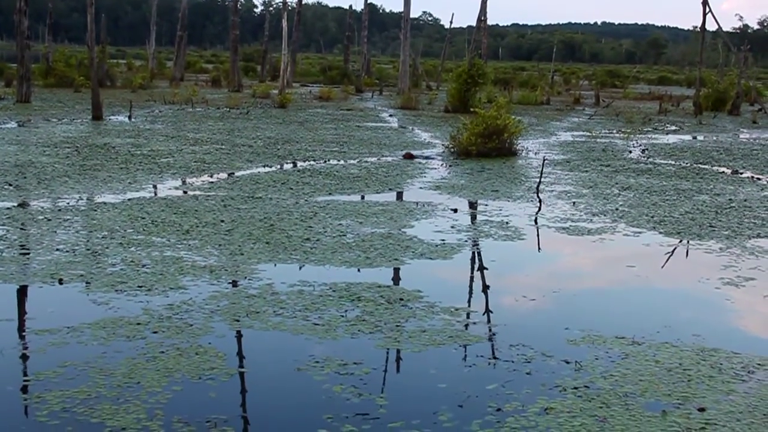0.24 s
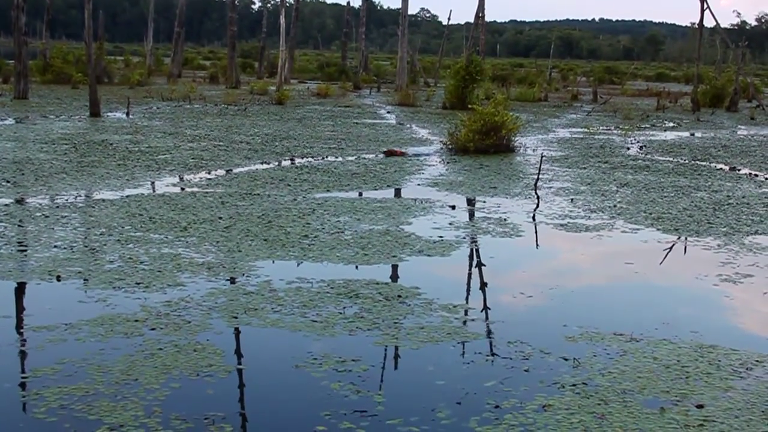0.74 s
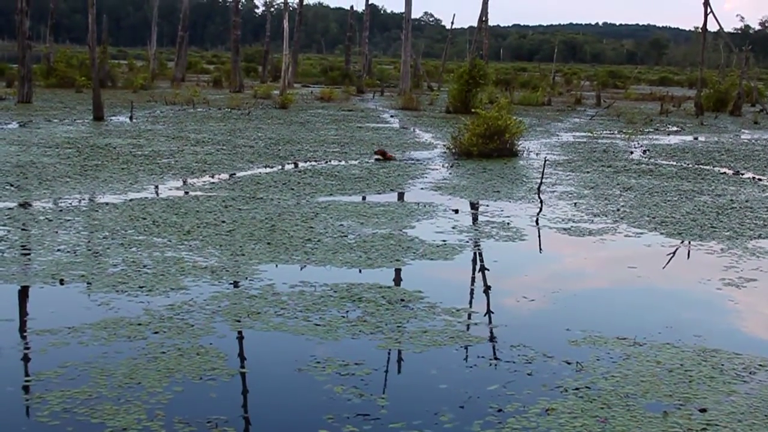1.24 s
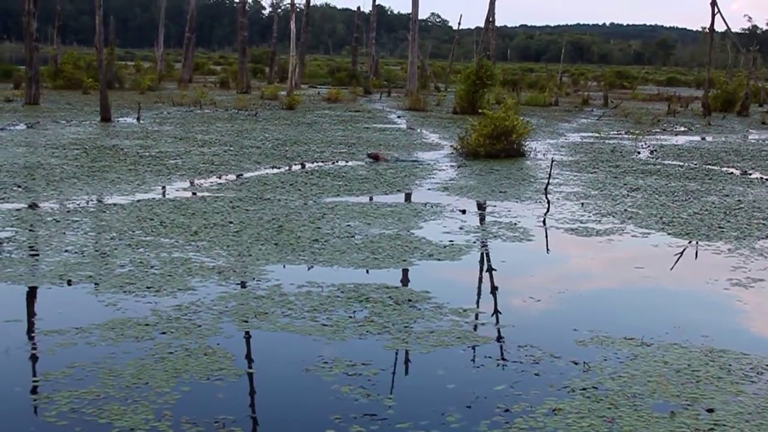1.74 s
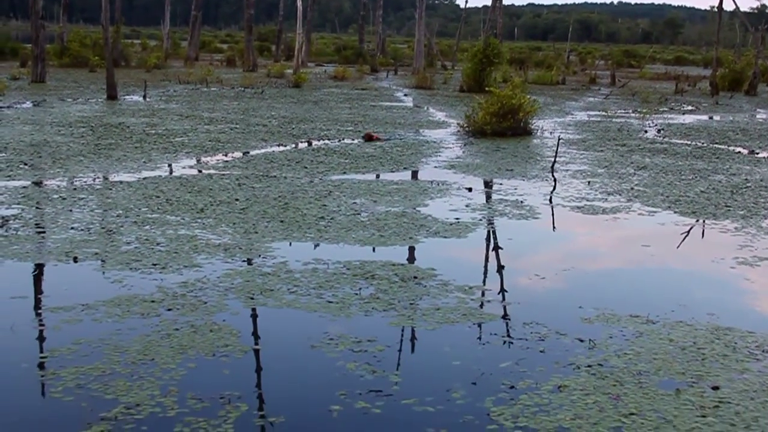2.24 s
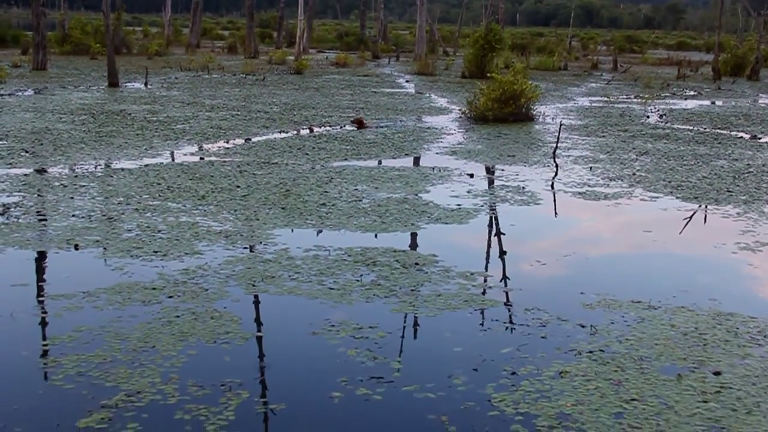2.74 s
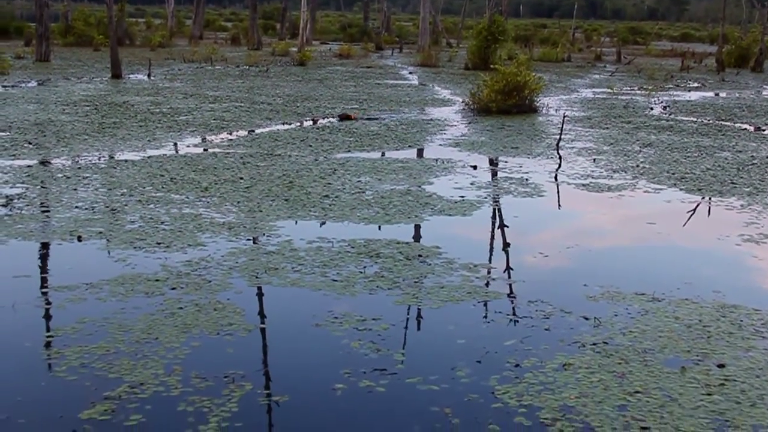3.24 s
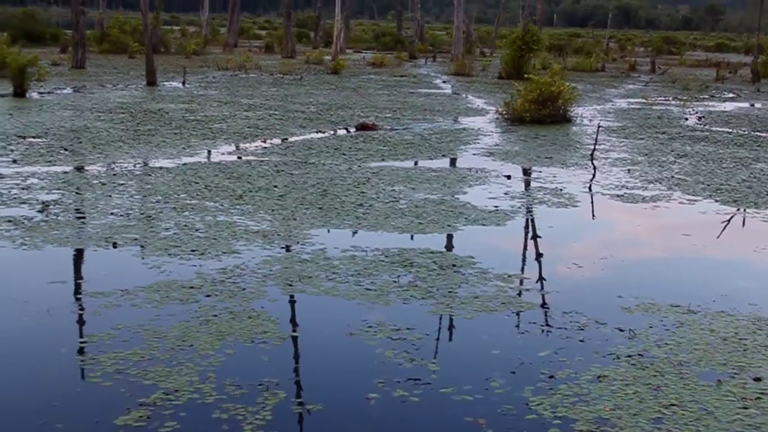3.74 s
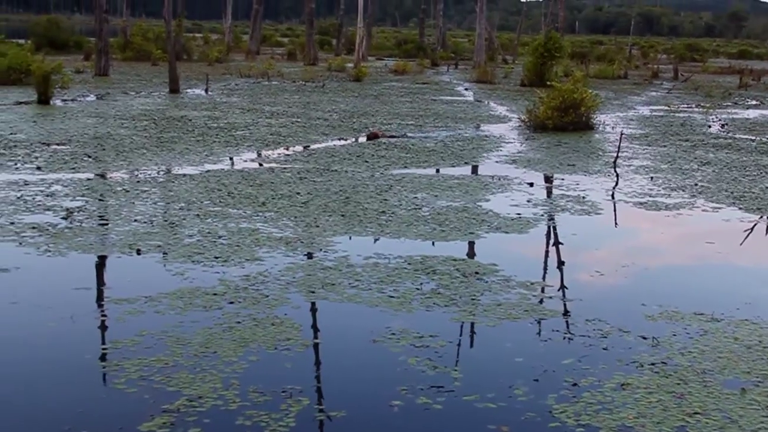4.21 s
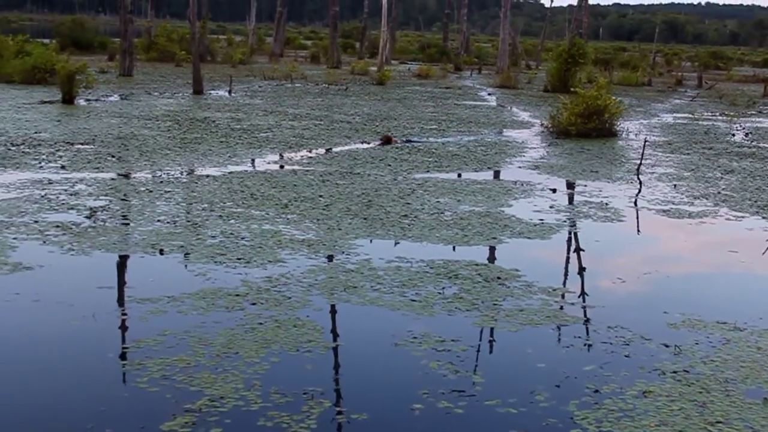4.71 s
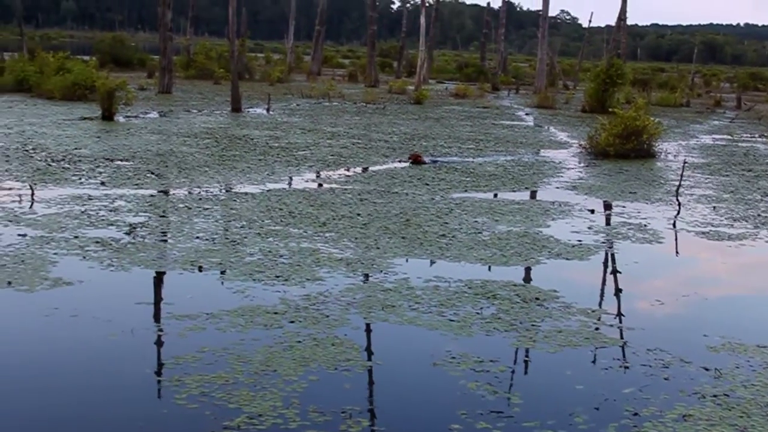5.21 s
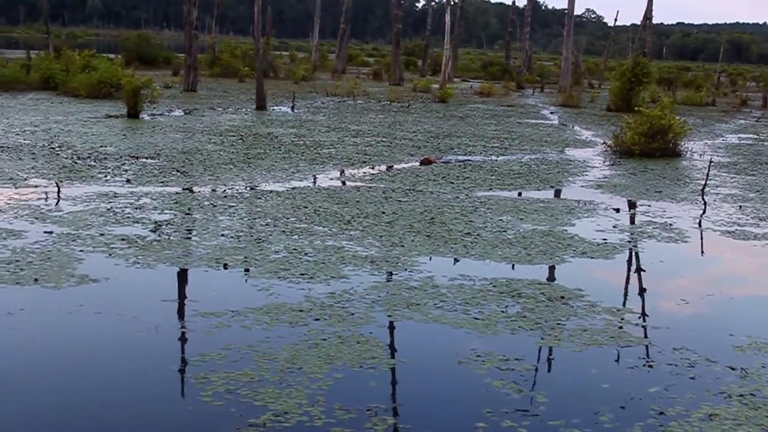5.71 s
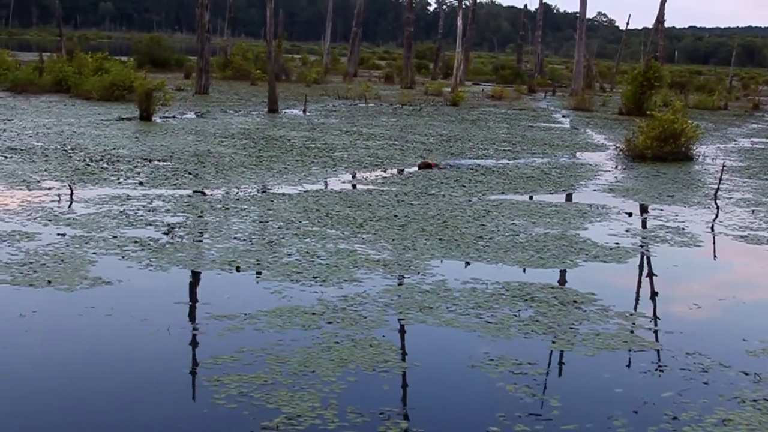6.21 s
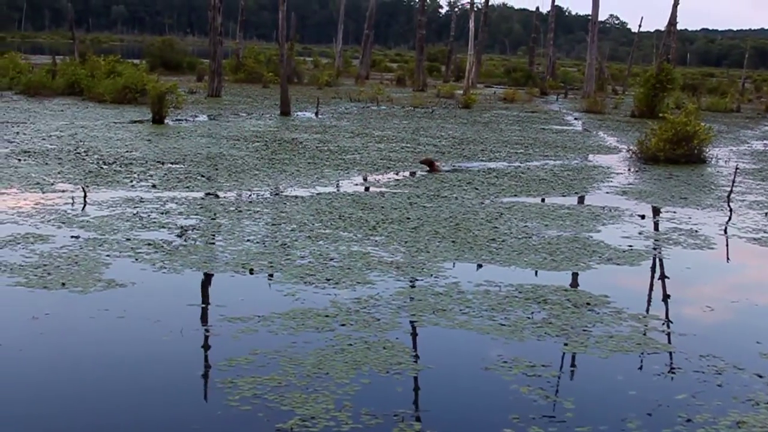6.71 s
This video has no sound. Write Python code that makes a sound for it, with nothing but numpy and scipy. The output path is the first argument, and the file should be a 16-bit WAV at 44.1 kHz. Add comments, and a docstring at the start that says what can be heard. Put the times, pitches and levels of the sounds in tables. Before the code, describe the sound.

Wetland ambience opens quietly with a very faint, quick run of alternating high and low chirps, then crickets, katydids and distant traffic swell into a steady bed. Short bubbly blips, muffled knocks and dry ticks happen near the microphone, busiest early and again late. A remote engine drone rises slightly in pitch after the middle and slowly nears. The final loudest sound is a bright, tiny water plip. Outdoor, centred, with no strong echo.

```python
"""Dusk over a marsh pond

Crickets trill and throb in the reeds; meadow katydids buzz and tick above them.
Water plops, small bubbles pop, and soft knocks and ticks sound close by.
Far off lie a road, a caller's brief chirps and a humming engine. The steady beds swell at the start.
Insects and traffic are shaped noise, ringing pulses and tones; bubbles and engine are short or steady tones.
"""
import sys
import numpy as np
from scipy import signal
from scipy.fft import rfft, irfft, next_fast_len
from scipy.io import wavfile

SR = 44100
rng = np.random.default_rng(int(sys.argv[2]) if len(sys.argv) > 2 else 0)


def wav_out(sig):
    """Save sig, one row per channel (or a flat mono array), as 16-bit PCM at SR to the path in sys.argv[1]."""
    wavfile.write(sys.argv[1], SR, np.round(np.clip(np.atleast_2d(sig).T, -1, 1) * 32767).astype(np.int16))


N = 306495
TIME = np.arange(N) / SR   # s

# Tone colour of each noise: (frequency [Hz], relative level [dB])
RUMBLE_SPECTRUM = [(20, -17), (45, -10), (70, 0), (110, 1.5), (180, 3), (290, 0), (400, -9.5), (600, -27),
                   (1200, -63)]
ROAD_SPECTRUM = [(250, -12), (450, -9), (650, -2.5), (880, 1), (1120, -2), (1320, -0.5), (1480, -8),
                 (2000, -12.5), (2600, -8.5), (5000, -15)]
CHORUS_SPECTRUM = [(1900, -49), (2250, -16.5), (2520, -11.5), (3050, -9.5), (3280, -2.5), (3500, -2.5),
                   (3750, -4.5), (3950, 0.5), (4250, 1), (4380, -4), (4500, 4), (4700, -5.5), (5400, -6)]
UPPER_CHORUS_SPECTRUM = [(4200, -31), (4850, 3), (5050, -4), (5300, 1.5), (5900, -1.5), (6400, -5.5),
                         (6700, -7), (7200, -8), (7600, -10), (8300, -11), (9200, -20), (10500, -21.5),
                         (13000, -16.5), (16000, -26)]
KATYDID_SPECTRUM = [(9000, -12.5), (10800, -9), (12000, -3), (13200, -3), (13700, -3.5), (14400, -2.5),
                    (15500, -6), (16000, -5)]
ZIP_SPECTRUM = [(10800, -30), (12200, -2), (13000, -5), (14300, 1), (16000, -10)]
KNOCK_SPECTRUM = [(40, 2), (80, -2), (300, -3), (560, 1.5), (900, -2), (1300, 1), (2000, -7.5), (2700, -2),
                  (3600, -8), (7000, -15), (15000, -27)]
TICK_SPECTRUM = [(2000, 2), (5000, 0), (10000, -7), (13000, 4), (16000, -8)]
# Engine tones: (multiple of firing rate [1], relative level when slow [dB], relative level when fast [dB])
ENGINE_TONES = [(1, -64, -65.5), (1.5, -55.5, -72), (2, -72, -63.5), (2.5, -57, -74), (3, -69, -55),
                (4, -55.5, -57.5), (5, -74, -60.5)]
# Nearer crickets: (wing pitch [Hz], relative width of the ring [Hz], wing strokes [per s],
# relative level [dB], throb depth [0-1], share in the opening swell [0-1])
NEAR_CRICKETS = [(2960, 440, 61, -55, 0.3, 0.8), (3320, 360, 30.4, -51, 0.97, 0.7),
                 (3600, 260, 33, -54, 0, 0), (3943, 120, 46.1, -49, 0.8, 1),
                 (4177, 99, 46.2, -47, 0.3, 0.9), (4550, 140, 53, -54, 0, 0.04), (5220, 300, 47, -49, 0, 1),
                 (6060, 480, 41, -48.5, 0, 1)]
# Thin, steady cricket trills: (pitch [Hz], level relative to the chorus [dB])
THIN_TRILLS = [(2682, -19), (2927, -29), (3107, -18), (3460, -32), (3967, -17), (4208, -20), (5344, -23),
               (5966, -18), (6049, -23), (6317, -26)]
# Single katydid strokes: (time [s], level [dB])
KATYDID_ZIPS = [(2.46, -41.5), (2.583, -40.5), (2.768, -38), (5.708, -42), (6.059, -40), (6.193, -39.5),
                (6.423, -44)]
# Soft knocks and rustles: (time [s], level [dB], spread to each side [s])
SOFT_KNOCKS = [(.357, -45, 0.0064), (0.378, -45, .004), (.625, -49, 0.029), (0.914, -43.5, .014),
               (1.473, -36.5, 0.0068), (1.522, -40.5, .0046), (1.701, -41, 0.019), (2.106, -42.5, .009),
               (5.238, -39.5, 0.012), (5.677, -44, .022)]
# Water plops: (time [s], relative level [dB], starting pitch [Hz])
WATER_PLOPS = [(.517, -40, 637), (.96, -34, 1640), (1.264, -33.5, 1750), (1.467, -31, 546),
               (1.678, -37, 574), (1.722, -30.5, 1250), (2.1, -34.5, 720), (2.101, -34, 2490),
               (2.196, -33.5, 666), (2.229, -35, 620), (3.093, -28.5, 2690), (3.627, -30, 1260),
               (4.43, -31, 2160), (5.052, -31, 1280), (5.224, -33, 1750), (5.371, -31, 1750),
               (5.392, -29.5, 730), (5.672, -31, 1830), (5.705, -28, 1510), (6.019, -32.5, 1570),
               (6.839, -23, 2580)]
# Dry ticks: (time [s], level [dB])
DRY_TICKS = [(1.728, -40), (3.095, -35.5), (3.907, -40), (5.687, -36), (6.841, -42)]
# Bouts of harder katydid singing: (time [s], gain [dB], spread to each side [s])
KATYDID_BOUTS = [(2.8, 0.9, .45), (5.45, 2.5, .2)]

# How each bed climbs, then holds:
# (held level [dB], depth of the climb [dB], length of the climb [s], bend [1 = even])
RUMBLE_CLIMB = (-50.5, 10, 3, 1.3)
ROAD_CLIMB = (-45, 12.5, 2.5, 1.9)
CHORUS_CLIMB = (-40.5, 9, 4, 1.0)
UPPER_CHORUS_CLIMB = (-43, 11, 5, 1.95)
KATYDID_CLIMB = (-51.5, 8, 2, 1.2)
NEAR_CRICKETS_CLIMB = (0, 34, 4, 1)
ENGINE_CLIMB = (-1.5, 22, 2.5, 0.55)
# One swell of far traffic: (time [s], gain [dB], spread to each side [s])
TRAFFIC_SWELL = (5.72, 2.4, 0.62)

SLOW_FIRING_HZ, FAST_FIRING_HZ = 71.5, 75.85
SPEED_UP_S, SPEED_LAG_S, APPROACH_DB_PER_S = 3.55, 0.4, 2.7
CHIRP_START_S, CHIRP_GAP_S = 0.022, 0.049
CHIRP_HZ, CHIRP_DB, CHIRP_SPREAD_S = (4800, 3510), -44.5, 0.009
POPS_PER_S, POPS_DB = 7, -12   # rate on calm water; level against the road bed
STIRRED_POPS_PER_S, STIR_SPREAD_S = 90, 0.05   # extra pops around each knock
POP_TILT_DB_PER_OCTAVE = -4.5   # high bubbles are smaller and fainter
BUBBLE_RISE_OCTAVES_PER_S = 8.0
PLOP_RING_CYCLES = 41   # cycles of the starting pitch in which a ring dies by 60 dB
PULSING_DEPTH, PULSING_WANDER = 0.5, 0.16   # katydid wing pulsing, 0-1
THROB_HZ, THROB_PEAK_S = 10.0, 5.03
CUTOFF_HZ = 15850


def from_db(db):
    """Turn decibels into a gain."""
    return 10 ** (np.asarray(db) / 20)


def rms_one(x):
    """Scale a sound to an average (rms) strength of 1."""
    return x / np.sqrt(np.mean(x ** 2) + 1e-20)


def drift(rate_hz):
    """Smooth random wandering with rms 1; a higher rate wanders faster."""
    step = 40   # work on every 40th sample, then join the points by lines
    r = np.exp(-2 * np.pi * rate_hz * step / SR)
    # The first 2000 points let the filter settle.
    random_steps = rng.standard_normal(N // step + 2002)
    slow = signal.lfilter([1], [1, -2 * r, r * r], random_steps)[2000:]
    return np.interp(np.arange(N) / step, np.arange(len(slow)), rms_one(slow))


def noise(spectrum):
    """Random hiss coloured by a spectrum, with rms 1."""
    size = next_fast_len(N)
    hz, db = np.transpose(spectrum)
    bins = np.maximum(np.arange(size // 2 + 1) * SR / size, 1)
    gain = from_db(np.interp(np.log(bins), np.log(hz), db, left=-90, right=-90))
    white = rng.standard_normal(size)
    return rms_one(irfft(rfft(white) * gain, size)[:N])


def resonate(x, hz, width_hz):
    """Ring at one pitch, as a struck body does; a narrow width rings longer."""
    r = np.exp(-np.pi * width_hz / SR)
    feedback = [1, -2 * r * np.cos(2 * np.pi * hz / SR), r * r]
    return signal.lfilter([1 - r, 0, r - 1], feedback, x + 1e-18)


def cycles(hz):
    """Count the cycles completed at a changing rate."""
    return np.cumsum(hz) / SR


def rise(level_db, depth_db, length_s, bend):
    """Level in dB that climbs from the start and then holds."""
    return level_db - depth_db * np.clip(1 - TIME / length_s, 0, 1) ** bend


def bell(s, height, spread_s):
    """A smooth bump around one moment."""
    return height * np.exp(-0.5 * ((TIME - s) / spread_s) ** 2)


def swells(rows):
    """Loudness curve of bell-shaped bursts from rows (time [s], level [dB], spread [s])."""
    out = np.zeros(N)
    for s, db, spread_s in rows:
        # Only the stretch close to the burst needs computing.
        near = slice(*np.searchsorted(TIME, [s - 4 * spread_s, s + 4 * spread_s]))
        out[near] += from_db(db) * np.exp(-0.5 * ((TIME[near] - s) / spread_s) ** 2)
    return out


def across_water(x, t60, direct):
    """Reeds and trunks scatter a far call into a short tail behind the direct sound."""
    t = TIME[:SR // 4]
    tail = rng.standard_normal(len(t)) * from_db(-60 * t / t60)   # falls 60 dB in t60 seconds
    scattered = signal.oaconvolve(x, tail / np.linalg.norm(tail))[:N]
    return rms_one(direct * x + scattered)


def throb(depth):
    """Crickets swell together ten times a second."""
    return 1 + np.clip(depth, 0, 1) * np.cos(2 * np.pi * THROB_HZ * (TIME - THROB_PEAK_S))


def far_road():
    """Rumble and tyre wash blend into low, unsteady noise from a far road."""
    rumble_db = rise(*RUMBLE_CLIMB) + 0.5 * drift(12.0)
    rumble = from_db(rumble_db) * noise(RUMBLE_SPECTRUM)
    wash_db = rise(*ROAD_CLIMB) + bell(*TRAFFIC_SWELL) + 0.97 * drift(25)
    wash = from_db(wash_db) * noise(ROAD_SPECTRUM)
    return rumble + wash


def engine():
    """A far engine speeds up and approaches; its tones shift weight with speed and waver on their way."""
    since_s = np.maximum(TIME - SPEED_UP_S, 0)
    speed = 1 - np.exp(-since_s / SPEED_LAG_S)   # 0 = slow, 1 = fast
    firing_hz = SLOW_FIRING_HZ + (FAST_FIRING_HZ - SLOW_FIRING_HZ) * speed
    turn = 2 * np.pi * cycles(firing_hz * (1 + 0.00296 * drift(4.4)))
    tones = np.zeros(N)
    for multiple, slow_db, fast_db in ENGINE_TONES:
        tone_db = slow_db + (fast_db - slow_db) * speed + 1.8 * drift(3)
        tones += from_db(tone_db) * np.sin(multiple * turn)
    return from_db(rise(*ENGINE_CLIMB) + APPROACH_DB_PER_S * since_s) * tones


def chirps(count=5):
    """A far caller gives a quick run of faint notes, high and low in turn."""
    out = np.zeros(N)
    for k in range(count):
        note = swells([(CHIRP_START_S + k * CHIRP_GAP_S, CHIRP_DB, CHIRP_SPREAD_S)])
        pitch_hz = CHIRP_HZ[k % 2] + 60 * drift(64)
        out += note * np.sin(2 * np.pi * cycles(pitch_hz))
    return out


def small_pops():
    """Tiny bubbles burst at random among floating leaves, most where knocks stir the water."""
    out = np.zeros(N)
    pitches = np.geomspace(650, 2700, 12)   # Hz
    sizes = from_db(3.0 * np.clip(rng.standard_normal(N), -2, 2))
    stirring = sum(bell(s, STIRRED_POPS_PER_S, STIR_SPREAD_S) for s, _, _ in SOFT_KNOCKS)
    rate = POPS_PER_S + stirring
    for hz in pitches:
        born = rng.random(N) < rate / len(pitches) / SR
        tilt_db = POP_TILT_DB_PER_OCTAVE * np.log2(hz / pitches[0])
        out += resonate(born * sizes, hz, hz / 9) * from_db(tilt_db)   # rings a few cycles
    return from_db(rise(*ROAD_CLIMB) + POPS_DB) * rms_one(out)


def knocks_and_ticks():
    """Dull bumps and rustles, each grainy with small contacts, and tiny dry snaps."""
    grain = rms_one(from_db(3.0 * np.clip(drift(230), -2, 2)))
    knocks = swells(SOFT_KNOCKS) * grain * noise(KNOCK_SPECTRUM)
    tick_bursts = swells([(s, db, 0.0012) for s, db in DRY_TICKS])
    return knocks + tick_bursts * noise(TICK_SPECTRUM)


def plops():
    """The surface splashes and a bubble rings, rising in pitch; big, low bubbles ring longest."""
    out = np.zeros(N + SR)   # spare second for the last ring
    t = TIME[:SR // 8]
    for s, db, hz in WATER_PLOPS:
        rising_hz = hz * 2 ** (BUBBLE_RISE_OCTAVES_PER_S * t)
        fade = from_db(-60 * t * hz / PLOP_RING_CYCLES)
        ring = np.sin(2 * np.pi * cycles(rising_hz)) * fade
        splash = rms_one(resonate(rng.standard_normal(len(t)), hz, hz)) * np.exp(-t / 0.005)
        at = round(s * SR)
        out[at:at + len(t)] += from_db(db) * (0.86 * ring + 0.28 * splash)
    return out[:N]


def katydids():
    """File and scraper rasp about fifty times a second; single strokes stand out as short zips."""
    buzz_db = rise(*KATYDID_CLIMB) + sum(bell(*bout) for bout in KATYDID_BOUTS)
    depth = PULSING_DEPTH + PULSING_WANDER * drift(1.2)
    stroke = 2 * np.pi * cycles(51.5 + 1.2 * drift(1.5))
    pulse_shape = 0.52 * np.cos(stroke) + 0.25 * np.cos(2 * stroke)
    pulsing = 1 + np.clip(depth, 0, 1) * pulse_shape
    buzz = from_db(buzz_db + 0.85 * drift(19)) * pulsing * noise(KATYDID_SPECTRUM)
    # A slower singer ticks on faintly between its loud strokes; the high power makes ticks short.
    ticking = np.cos(np.pi * cycles(15.5 + 1.5 * drift(3))) ** 20
    faint_ticks = from_db(buzz_db - 1 + 3.0 * drift(4)) * ticking
    loud_zips = swells([(s, db, 0.004) for s, db in KATYDID_ZIPS])
    return buzz + (faint_ticks + loud_zips) * noise(ZIP_SPECTRUM)


def far_crickets():
    """Countless far crickets merge into a hiss, its lower part gently throbbing."""
    chorus = from_db(rise(*CHORUS_CLIMB)) * noise(CHORUS_SPECTRUM) * throb(0.048)
    return chorus + from_db(rise(*UPPER_CHORUS_CLIMB)) * noise(UPPER_CHORUS_SPECTRUM)


def near_crickets():
    """Each wing stroke gives a push that makes the wing ring at its own pitch."""
    out = np.zeros(N)
    swell_db = rise(*NEAR_CRICKETS_CLIMB)
    for hz, width_hz, stroke_rate, db, depth, share in NEAR_CRICKETS:
        stroke_count = np.floor(cycles(stroke_rate * (1 + 0.001 * drift(3))))
        strokes = np.diff(stroke_count, prepend=0)   # one click per stroke
        ring_width_hz = width_hz * 1.65
        wing = resonate(resonate(strokes, hz, ring_width_hz), hz, ring_width_hz)
        level = from_db(db + share * swell_db - 3.0 + 0.81 * drift(0.92))
        out += level * across_water(wing, t60=0.13, direct=0.32) * throb(depth)
    return out


def cricket_trills():
    """Thin whistling tones waver slightly in pitch and loudness."""
    out = np.zeros(N)
    chorus_db = rise(*CHORUS_CLIMB)
    for hz, db in THIN_TRILLS:
        waver = from_db(2.0 * drift(5.1))
        tone = np.sin(2 * np.pi * cycles(hz + 7 * drift(14)))
        out += from_db(chorus_db + db) * waver * tone
    return out


def scene():
    """Add up all sources, alike in both channels."""
    distance = far_road() + engine() + chirps()
    close = small_pops() + knocks_and_ticks() + plops()
    insects = katydids() + far_crickets() + near_crickets() + cricket_trills()
    return np.tile(distance + close + insects, (2, 1))


def record(dry):
    """Cut the treble steeply above the cutoff."""
    low_pass = signal.ellip(12, 0.1, 90, CUTOFF_HZ, fs=SR, output="sos")
    return signal.sosfilt(low_pass, dry)


dry = scene()
out = record(dry)
wav_out(out)
```